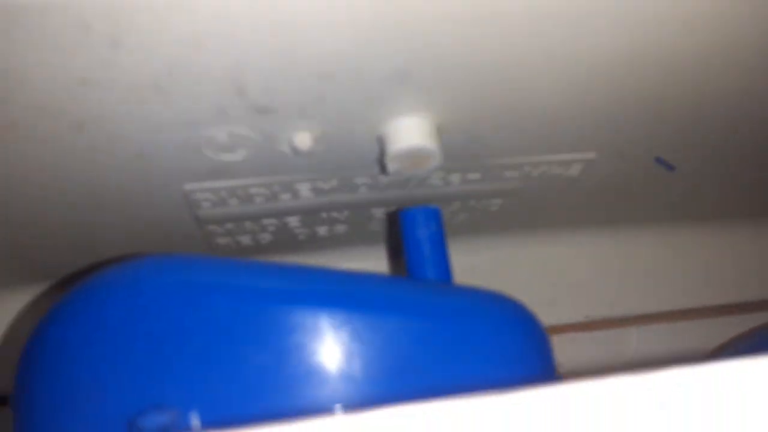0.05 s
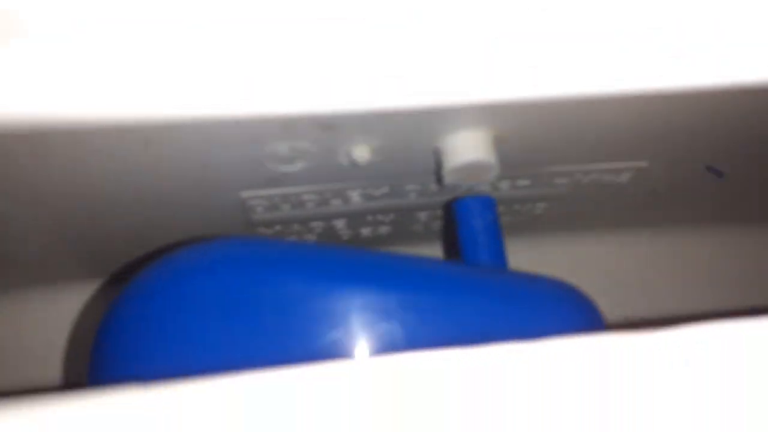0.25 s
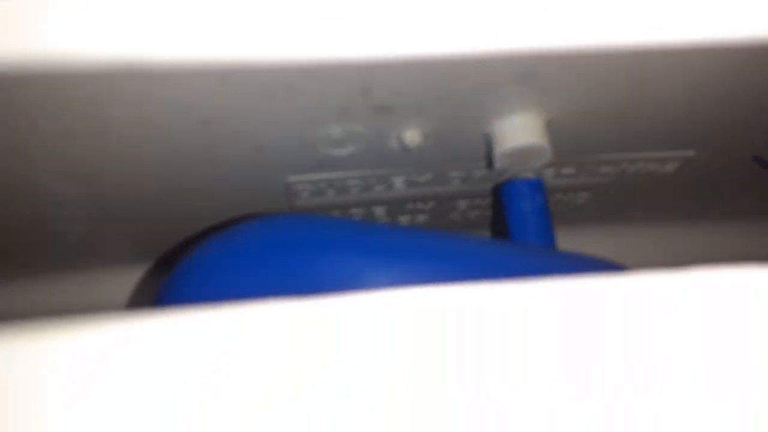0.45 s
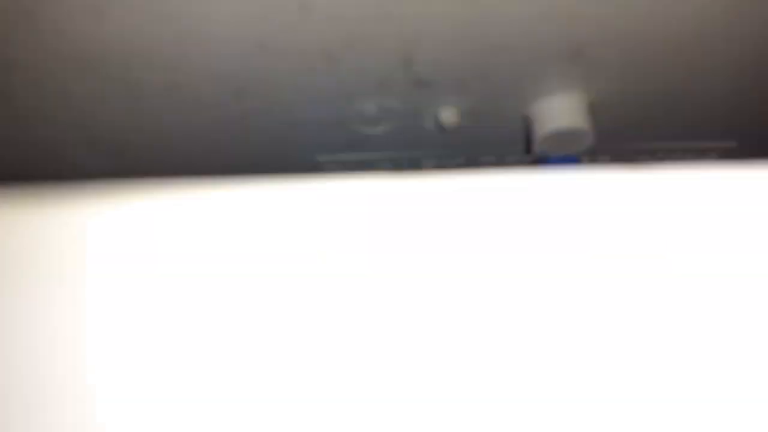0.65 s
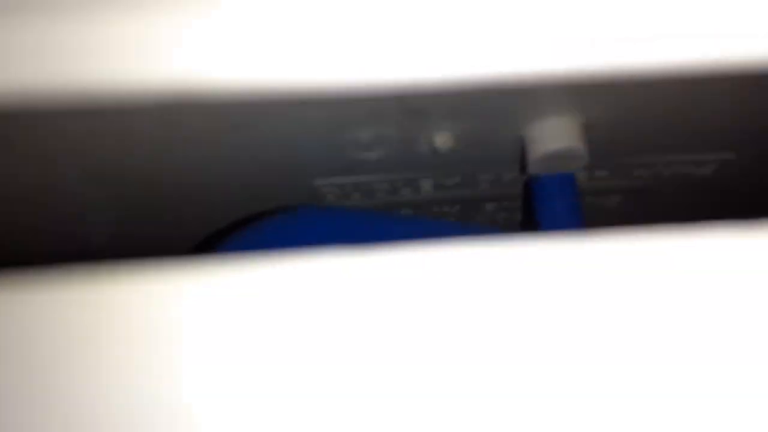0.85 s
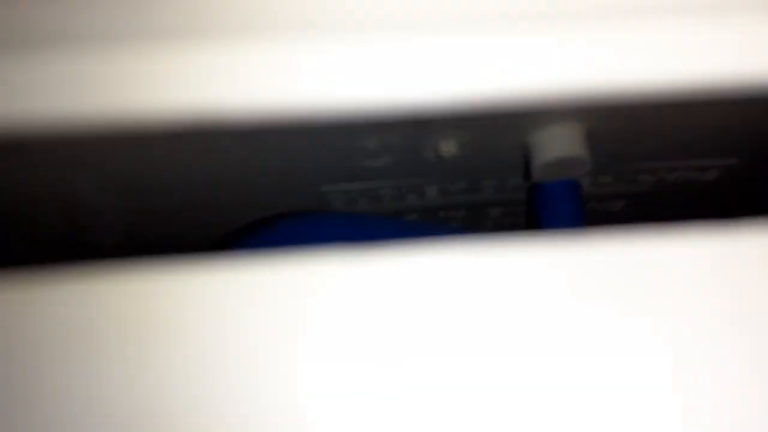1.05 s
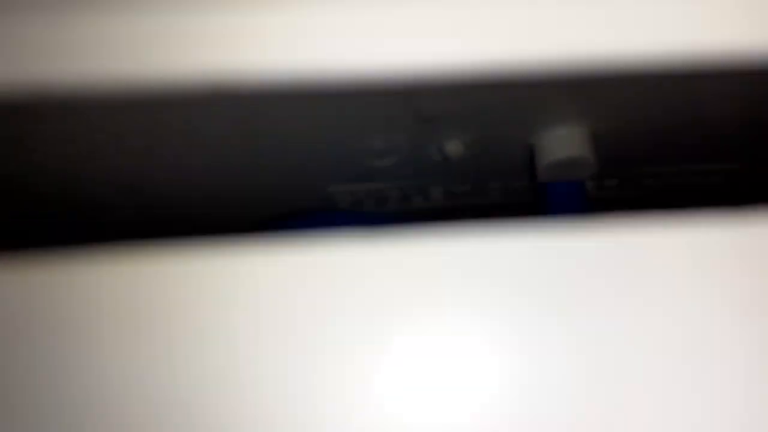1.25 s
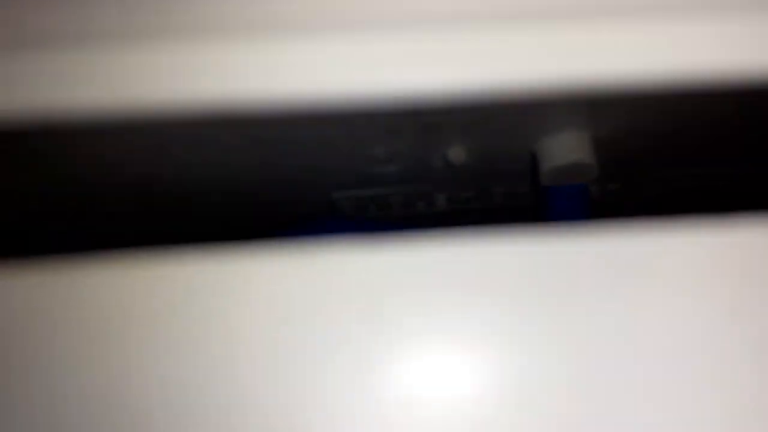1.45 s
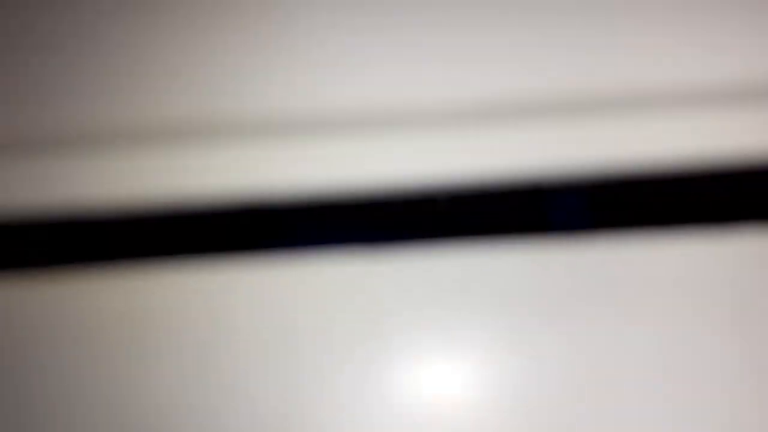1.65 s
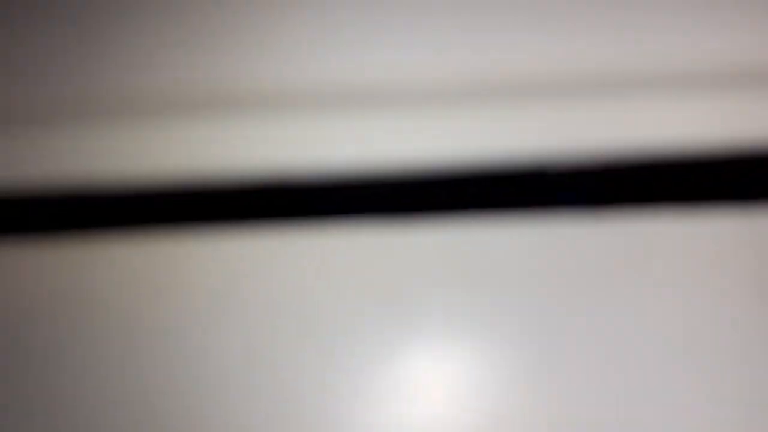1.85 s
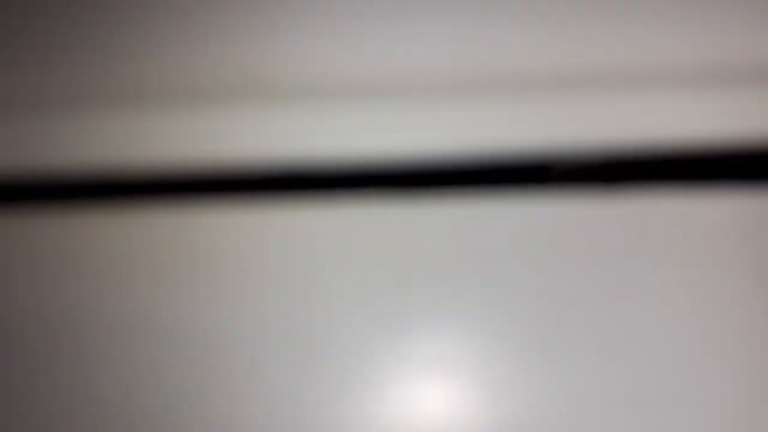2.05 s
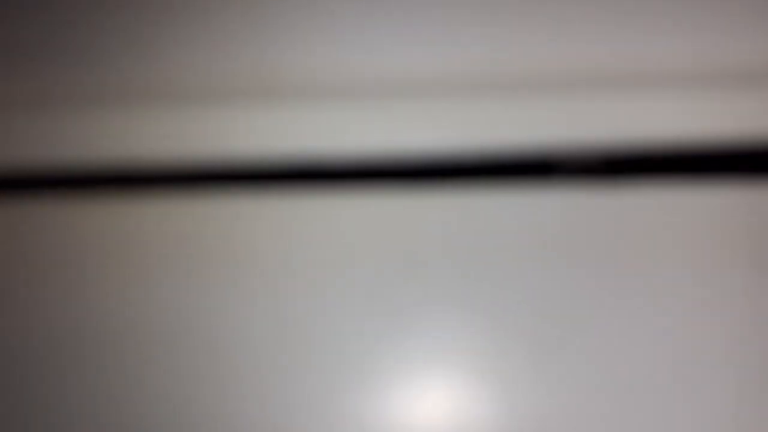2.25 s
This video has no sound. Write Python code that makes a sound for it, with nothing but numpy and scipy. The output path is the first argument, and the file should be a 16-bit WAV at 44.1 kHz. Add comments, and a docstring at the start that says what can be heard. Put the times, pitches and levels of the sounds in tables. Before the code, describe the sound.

A ceramic toilet tank lid lands with one hard, ringing clank, then slides in short gritty pushes with soft bumps and groans, ending in dry ticks. It is close to the microphone in a small hard room with a faint hum.

```python
"""Ceramic lid on a toilet tank

The lid lands with one hard clank that rings the ceramic, then slides into place close to the microphone.
Its unglazed rim hisses, grinds and groans in short pushes, bumps softly, and ticks as it sticks and
slips at the end. A small hard room answers, over a faint steady hum."""
import sys
import numpy as np
from scipy import signal
from scipy.fft import rfft, irfft, next_fast_len
from scipy.io import wavfile
from scipy.ndimage import map_coordinates

SR = 44100
rng = np.random.default_rng(int(sys.argv[2]) if len(sys.argv) > 2 else 0)


def write(x):
    x = np.atleast_2d(x).T
    wavfile.write(sys.argv[1], SR, np.round(np.clip(x, -1, 1) * 32767).astype(np.int16))


N = 105840
SIDE = np.array([[.5], [-.5]])  # splits a left-over-right amount between the channels


def amp(db):
    """Decibels to gain."""
    return 10 ** (np.asarray(db) / 20)


def unit(x):
    """Scale to rms 1."""
    return x / np.sqrt(np.mean(x ** 2) + 1e-20)


def along(points, hz):
    """Read a curve of (frequency, value) points on a log frequency axis."""
    freqs, values = np.transpose(points)
    return np.interp(np.log(hz + 1), np.log(freqs + 1), values)


def add(out, start_s, x):
    """Mix x into out at start_s."""
    i = max(round(start_s * SR), 0)
    out[:, i:i + x.shape[-1]] += x[..., :max(N - i, 0)]


def filtered(x, response):
    """Filter x by a gain that is a function of frequency."""
    n = x.shape[-1]
    size = next_fast_len(n + 2048)
    return irfft(rfft(x, size) * response(np.fft.rfftfreq(size, 1 / SR)), size)[..., :n]


def wobble(per_s, n):
    """A smooth random curve with per_s knots a second."""
    knots = rng.standard_normal(int(n * per_s / SR) + 4)
    return map_coordinates(knots, [np.arange(n) * per_s / SR])


def noise(n, width=1.0):
    """Stereo white noise; width weights what the channels do not share."""
    return unit(rng.standard_normal(n) + width * rng.standard_normal((2, n)))


def coloured_noise(eq, n, width=1.0):
    """Stereo noise through an EQ curve, at rms 1."""
    return unit(filtered(noise(n, width), lambda hz: amp(along(eq, hz))))


def band_decay(x, t60s):
    """Fade each band of x at its own speed."""
    hz, t, bands = signal.stft(x, SR, nperseg=128)
    fade = amp(-60 * t / along(t60s, hz)[:, None])
    return signal.istft(bands * fade, SR)[1][:, :x.shape[-1]]


# tone of the room air (frequency [Hz], level [dB])
AIR_EQ = [(15, -71), (25, -40.5), (92, -5), (195, 3.5), (270, -9), (335, -7), (394, -17), (591, -10),
          (659, -26), (911, -23), (1130, -14.5), (1480, -35.5), (9320, -49), (16000, -32.5)]
# partials of the hum (frequency [Hz], level [dB])
HUM_PARTIALS = [(126, -63), (172.5, -58), (227, -69.5), (327.5, -61), (656, -78)]

def room_tone():
    """A bed of quiet air and a low hum whose partials waver in level and phase."""
    t = np.arange(N) / SR
    waver_db, air_db = -2, -59
    hum = np.zeros(N)
    for hz, db in HUM_PARTIALS:
        level = amp(db + waver_db * wobble(14, N))
        hum += level * np.sqrt(2) * np.sin(2 * np.pi * hz * t + 0.13 * wobble(6.6, N))
    return hum + amp(air_db) * coloured_noise(AIR_EQ, N)


# reverb time of the room (frequency [Hz], T60 [s])
REVERB_DECAY = [(100, .35), (1000, 0.28), (4000, 0.25), (14000, 0.18)]

def reverb(x):
    """Close hard walls return a short, wide tail."""
    build_s, wet_db = 0.0076, -11.5
    tail = band_decay(noise(SR // 2, width=1.7), REVERB_DECAY)
    tail *= np.minimum(np.arange(SR // 2) / SR / build_s, 1)
    return amp(wet_db) * signal.fftconvolve(x, tail / np.linalg.norm(tail[0]), axes=1)[:, :N]


# groans of the rim (time [s], length [s], resonance [Hz], level [dB])
GROAN_CUES = [(1.02, 0.079, 904, -59), (1.29, .1, 300.4, -41.5), (1.403, 0.028, 915, -74),
              (1.469, 0.056, 930, -53), (1.89, 0.086, 253.8, -51.5), (2.056, 0.055, 266.7, -45.5),
              (2.162, 0.052, 267, -47.5)]

def groans():
    """Under a firm push, friction feeds one hollow resonance, which swells and fades."""
    out = np.zeros((2, N))
    bandwidth = .08  # as a share of the centre frequency
    for start_s, length, centre_hz, db in GROAN_CUES:
        n = int(length * SR)
        resonance = lambda hz: 1 / (1 + (2 * (hz / centre_hz - 1) / bandwidth) ** 2)
        tone = unit(filtered(noise(n, width=.2), resonance))
        swell = np.sin(np.pi * np.arange(n) / n)
        add(out, start_s, amp(db) * swell * tone)
    return out


# tone of ceramic clatter, in catches and knocks (frequency [Hz], level [dB])
CLATTER_EQ = [(60, -9.5), (200, -3), (450, -0.5), (680, -10.5), (950, -4.5), (1800, -19), (3200, -16.5),
              (4500, -10), (5600, -24), (6270, -3), (6750, -15.5), (7450, -7), (8200, -18.5),
              (10500, -15.5), (11800, -4), (12800, -17), (16000, -17.5)]
# rough catches of the rim (time [s], level [dB], low-pass cutoff [Hz])
CATCH_CUES = [(0.712, -54, 3000), (0.743, -49.5, 7750), (1.494, -44, 5640), (1.504, -62, 5530),
              (1.598, -46, 7000)]

def catches(t):
    """The rim snags on a grain and rattles briefly."""
    out = np.zeros((2, N))
    low_cut_hz, t60 = 2500, .07
    for start_s, db, cutoff_hz in CATCH_CUES:
        band = lambda hz: hz / (hz + low_cut_hz) / (1 + (hz / cutoff_hz) ** 4)
        rattle = filtered(noise(len(t)), lambda hz: amp(along(CLATTER_EQ, hz)) * band(hz))
        add(out, start_s, amp(db - 60 * t / t60) * unit(rattle))
    return out


# ringing modes of lid and tank (frequency [Hz], level [dB], T60 [s])
CERAMIC_MODES = [(205, -18.5, .1), (261.4, -8, 0.55), (289, -10.5, 0.46), (322.6, -9.5, 0.35),
                 (351, -5, 0.2), (411.3, -22, 0.093), (519, -24, 0.78), (538, -20, 0.41), (760.5, 0, 0.2),
                 (886.5, -4.5, 0.17), (935.3, 1, 0.1), (1059, -19.5, 0.14), (1184, -21, 0.13),
                 (1359, -6, 0.12), (1475, -5.5, 0.14), (1718, -11.5, 0.11), (1810, -10, 0.047),
                 (2251, -8.5, .08), (2550, -12.5, 0.048)]

def ring(t, modes=CERAMIC_MODES):
    """A struck body rings as damped sines of alternating polarity."""
    return sum((-1) ** k * amp(db - 60 * t / t60) * np.sin(2 * np.pi * hz * t)
               for k, (hz, db, t60) in enumerate(modes))


# tone of a tick (frequency [Hz], level [dB])
TICK_EQ = [(40, -4), (150, 9), (600, 6), (1500, 2), (3500, -1), (6000, 0), (7800, 4), (9500, -3),
           (12000, 0), (16000, -1)]
# stick-slip ticks (time [s], level [dB])
TICK_CUES = [(1.6285, -40), (1.6422, -36), (1.6515, -30), (1.6638, -35), (1.688, -37), (1.798, -55),
             (1.905, -52), (1.984, -40), (2.0087, -44), (2.0632, -40), (2.0827, -35), (2.1077, -37),
             (2.1301, -35), (2.1318, -40), (2.153, -39), (2.1815, -37), (2.204, -44), (2.2347, -48),
             (2.2412, -38), (2.2637, -32), (2.2838, -30), (2.2997, -36)]

def ticks(t):
    """The lid sticks and slips: dry, gritty clicks that barely ring the ceramic."""
    out = np.zeros((2, N))
    click_db, slip_db, tail_db, ring_db = 6, -4, -27, -28
    slip_t60, tail_t60 = .004, .025
    # a minimum-phase impulse packs the tick's tone into the sharpest attack
    cepstrum = irfft(np.log(amp(along(TICK_EQ, np.fft.rfftfreq(2048, 1 / SR)))))
    causal_window = np.r_[1, np.full(1023, 2), np.zeros(1024)]
    click = irfft(np.exp(rfft(cepstrum * causal_window)))
    slip = amp(slip_db - 60 * t / slip_t60) + amp(tail_db - 60 * t / tail_t60)
    faint_ring = amp(ring_db) * ring(t)
    for start_s, db in TICK_CUES:
        grit = coloured_noise(TICK_EQ, len(t), width=0.72)
        add(out, start_s, amp(db + click_db) * click / np.abs(click).max())
        add(out, start_s, amp(db) * (slip * grit + faint_ring))
    return out


# tone of the rim's hiss, its rumble and its drive into the modes (frequency [Hz], level [dB])
HISS_EQ = [(200, 1), (1000, -5.5), (2300, -5.5), (3500, 3), (5000, 4), (6200, 2), (7500, 5.5), (9000, -3),
           (12000, 4), (16000, 1.5)]
RUMBLE_EQ = [(25, -27), (60, -21), (100, 4.5), (145, -1), (210, -16.5), (260, 5), (320, -11), (420, -16.5),
             (800, -23), (1600, -22), (5000, -70)]
GRIND_EQ = [(100, -12.5), (300, -1.5), (550, -20), (760, -5.5), (915, -4), (1100, -4.5), (1400, -19),
            (2300, -5), (3500, -16.5), (8000, -23.5)]
# pushes of the lid (time [s], length [s], attack [s], release per 20 dB [s], hiss [dB],
# hiss tilt above 700 Hz [dB/octave], grind [dB], rumble [dB])
PUSH_CUES = [(0, .113, 0.0014, 0.026, -50, -3, -53, -47),
             (0.147, 0.021, 0.0016, 0.021, -51.5, -4, -48.5, -54),
             (0.179, 0.015, 0.0022, 0.036, -44, -3, -53, -45),
             (0.364, 0.051, .02, 0.029, -71, -1, -75, -54.5),
             (0.674, 0.11, 0.0065, 0.034, -72.5, -3.5, -71, -53.5),
             (0.736, 0.0079, 0.0025, 0.055, -54, -4.5, -56, -38.5),
             (0.818, .12, 0.017, 0.025, -78, -7.5, -67.5, -60),
             (0.943, 0.0095, 0.0066, 0.072, -56, -6.5, -57.5, -53.5),
             (1.15, 0.087, 0.08, 0.033, -81, -1, -68.5, -55), (0.983, 0.085, .04, .05, -57, -2.5, -54, -56),
             (1.086, 0.029, .01, 0.057, -68.5, -5.5, -78, -59.5),
             (1.207, .168, 0.11, 0.026, -52.5, 4, -66, -49.5),
             (1.404, .04, 0.0087, .03, -73.5, 0.5, -63, -71),
             (1.444, 0.042, .05, 0.034, -47, 1, -47, -50.5),
             (1.506, .04, 0.0088, 0.026, -54, -3.5, -63, -45.5),
             (1.566, .1, 0.0099, 0.027, -54.5, -5, -48, -44.5),
             (1.695, 0.22, 0.0041, 0.066, -65, -8.5, -86.5, -52),
             (1.895, 0.11, 0.028, 0.069, -54, -9, -57, -51),
             (2.066, .15, 0.0092, .03, -66.5, -4.5, -87, -51.5),
             (2.253, 0.038, 0.0087, 0.063, -54.5, -3, -52.5, -50),
             (2.314, 0.07, .015, 0.023, -56.5, -0.5, -85, -60.5)]

def scrape(t):
    """The gritty rim hisses, rumbles and grinds the damped ceramic modes while the lid is pushed."""
    out = np.zeros((2, N))
    judder_db, judder_per_s = 1, 54
    grit_db, grit_per_s = 0.5, 1000
    damping_db_per_s = 99.5
    body = ring(t) * amp(-damping_db_per_s * t)
    body /= np.linalg.norm(body)
    for start_s, length, attack, release, hiss_db, tilt_db, grind_db, rumble_db in PUSH_CUES:
        n = int((length + 3 * release) * SR)
        age = np.arange(n) / SR
        push = np.minimum(age / attack, 1) * amp(-20 * np.maximum(age - length, 0) / release)
        push *= amp(judder_db * wobble(judder_per_s, n))
        grit = noise(n) * amp(grit_db * wobble(grit_per_s, n))
        tilt = lambda hz: tilt_db * np.log2(np.maximum(hz / 700, 1))
        hiss = unit(filtered(grit, lambda hz: amp(along(HISS_EQ, hz) + tilt(hz))))
        rumble = coloured_noise(RUMBLE_EQ, n, width=0.083)
        add(out, start_s, push * (amp(hiss_db) * hiss + amp(rumble_db) * rumble))
        drive = push * filtered(unit(grit), lambda hz: amp(along(GRIND_EQ, hz)))
        add(out, start_s, amp(grind_db) * signal.fftconvolve(drive, body[None], axes=1))
    return out


# low modes of the tank on its mounting (frequency [Hz], level [dB], T60 [s])
THUD_MODES = [(77.2, 5.5, 0.13), (103.7, -2, 0.66), (129, -12, .34)]
# pan of the knocks, which come from the far corner (frequency [Hz], left over right [dB])
KNOCK_PAN = [(100, 8), (200, 8), (380, 4), (800, 5.5), (1200, 2), (2400, 3), (5000, 3.5), (9000, -1),
             (13000, 2.5)]
# the clank and soft bumps (time [s], level [dB], low-pass cutoff [Hz], thud [dB], damping [dB/s])
KNOCK_CUES = [(0.088, -40, 350, -47, 44), (.2075, -18, 15000, -25, 23.5),
              (0.2134, -28.5, 4960, -32.5, 15.5), (.222, -25.5, 3930, -38.5, 19.5),
              (.385, -46.5, 616, -52.5, 28), (0.7128, -54, 1130, -38, 153), (.741, -46.5, 1020, -39, 49),
              (1.269, -31, 402, -50, 90), (1.285, -37.5, 398, -62, 74), (1.412, -47, 830, -49.5, 9),
              (1.498, -46, 1150, -49, 6), (1.519, -46, 400, -41, 59), (1.563, -32, 354, -45, 108),
              (1.805, -31, 297, -50.5, 328)]
# ring time of the dense ceramic modes (frequency [Hz], T60 [s])
CLATTER_DECAY = [(100, 0.22), (1000, 0.33), (3000, 0.12), (7000, .06), (14000, 0.031)]

def knocks(t):
    """Each contact rings the ceramic with a crack; soft ones lose treble and a held lid dies sooner."""
    out = np.zeros((2, N))
    clatter_db, crack_db, crack_t60 = 1, -7.5, 0.0082
    body, thud = ring(t), ring(t, THUD_MODES)
    for start_s, db, cutoff_hz, thud_db, damping in KNOCK_CUES:
        clatter = band_decay(coloured_noise(CLATTER_EQ, len(t)), CLATTER_DECAY)
        crack = amp(crack_db - 60 * t / crack_t60) * noise(len(t))
        softness = signal.butter(4, cutoff_hz, fs=SR, output="sos")
        hit = signal.sosfilt(softness, body + amp(clatter_db) * clatter + crack)
        add(out, start_s, amp(-damping * t) * (amp(db) * hit + amp(thud_db) * thud))
    # offset the mix pan so that the knocks land on their own pan
    return filtered(out, lambda hz: amp(SIDE * (along(KNOCK_PAN, hz) - along(MIX_PAN, hz))))


# pan of the whole mix (frequency [Hz], left over right [dB])
MIX_PAN = [(100, 3), (220, 5), (400, 1.5), (750, 5.5), (1300, 11), (4400, 2), (8000, 8), (14000, 1.5)]
# phase offset from standing waves (frequency [Hz], left lead [rad])
STANDING_WAVE_PHASE = [(100, -2.8), (400, 0.27), (750, -0.93), (930, -2.3), (1080, -1.4), (1400, 0.14),
                       (2500, 0.56)]

def stereo_image(hz):
    """The left side is nearer, so it is louder and earlier; standing waves bend the phase."""
    lag_s = 0.0003713
    phase = 2 * np.pi * hz * lag_s + along(STANDING_WAVE_PHASE, hz)
    return amp(SIDE * along(MIX_PAN, hz)) * np.exp(1j * SIDE * phase)


def scene():
    """The lid, its reverb and the room tone, sitting left of centre."""
    t = np.arange(SR // 2) / SR
    t_short = t[:len(t) // 2]
    lid = knocks(t) + scrape(t) + groans() + ticks(t_short) + catches(t_short)
    return filtered(lid + reverb(lid) + room_tone(), stereo_image)


def record(dry):
    """A low cut thins the deepest bass and a brick-wall filter trims the very top."""
    low_cut_hz, top_hz = 46, 16100
    thinned = signal.lfilter(*signal.butter(4, low_cut_hz, "high", fs=SR), dry)
    return filtered(thinned, lambda hz: hz < top_hz)


dry = scene()
out = record(dry)
write(out)
```